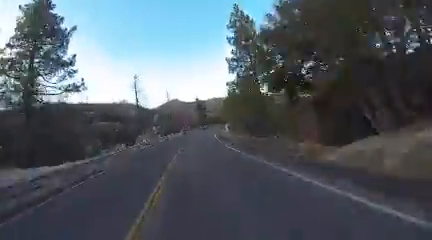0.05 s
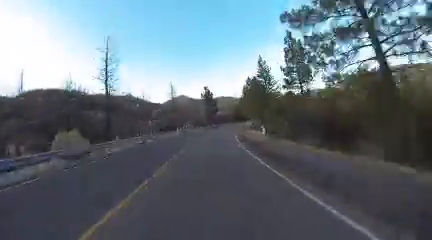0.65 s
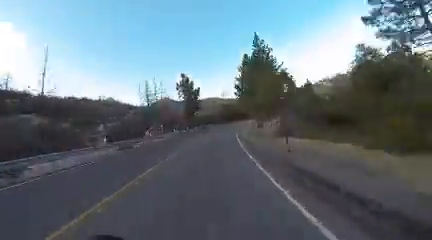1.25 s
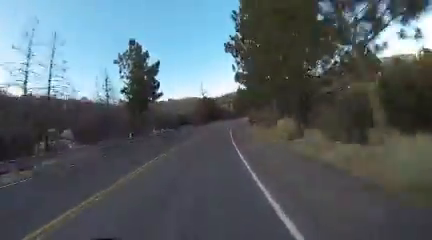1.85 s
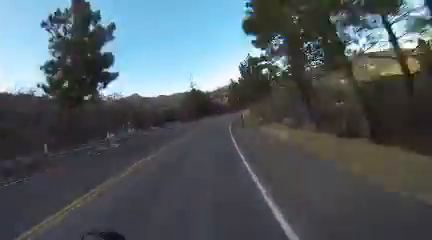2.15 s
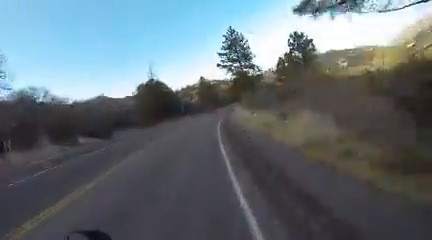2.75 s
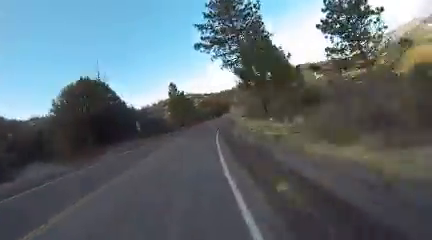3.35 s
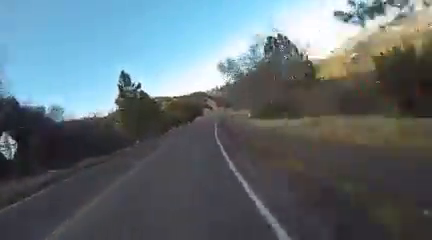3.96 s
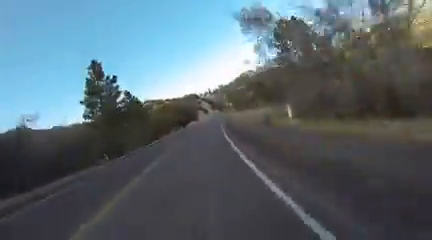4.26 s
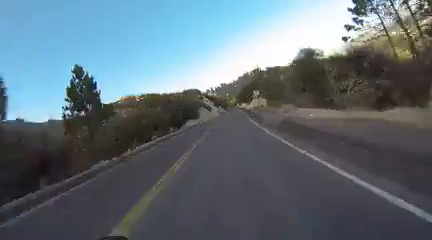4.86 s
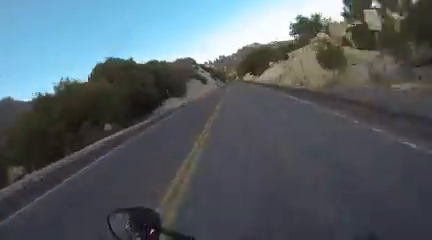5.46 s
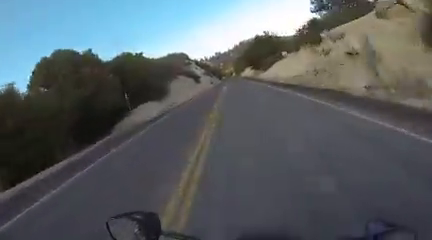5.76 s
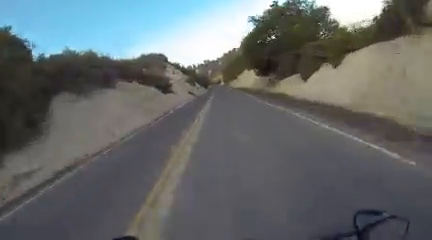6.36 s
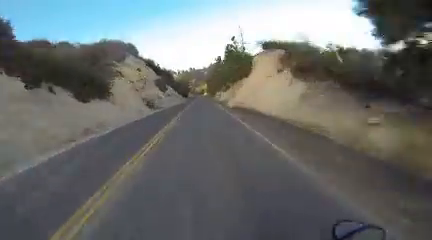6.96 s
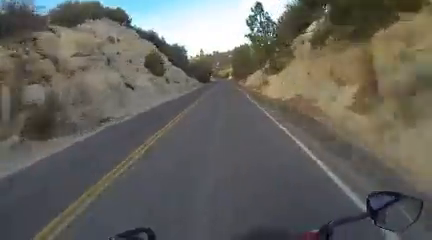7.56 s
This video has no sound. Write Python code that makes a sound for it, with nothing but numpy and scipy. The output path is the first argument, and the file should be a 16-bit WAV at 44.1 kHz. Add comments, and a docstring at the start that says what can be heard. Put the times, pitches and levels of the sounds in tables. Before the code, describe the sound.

Gusty wind buffets the microphone on a moving motorcycle while its humming engine gradually revs higher and grows louder.

```python
"""A motorcycle engine drones under thumping, fluttering wind, heard while riding up a mountain road.
Each firing of the engine makes one dip in air pressure, and the quick dips blend into a note.
At about five seconds the throttle opens: the note climbs and turns raspy, and the wind's roar eases.
Air tears past the housing of a camera on the bike. Its swirls roar, rush and hiss, flaring up
with every dip in pressure, and a faint whistle comes off an edge."""
import sys
import numpy as np
from scipy import signal
from scipy.fft import rfft, irfft, next_fast_len
from scipy.io import wavfile

SR = 44100
rng = np.random.default_rng(int(sys.argv[2]) if len(sys.argv) > 2 else 0)


def materialize(psi):
    """Save the field psi as 16-bit PCM at rate SR to the path in sys.argv[1].

    A 1-D psi becomes a single channel; in a 2-D psi each row is a channel.
    """
    bounded = np.clip(np.atleast_2d(psi).T, -1, 1)
    quanta = np.round(bounded * 32767).astype(np.int16)
    wavfile.write(sys.argv[1], SR, quanta)


N = 336042
TIME = np.arange(N) / SR


# How fast the engine runs. Each row: time in seconds, firings per second.
FIRING_RATE = [(0, 129.8), (.8, 129.6), (1.5, 135.8), (2.3, 136), (3, 138.7), (4, 136.5), (4.7, 140.5),
               (5, 143), (5.45, 145.2), (5.95, 145.6), (6.25, 147.4), (6.75, 151.8), (7.2, 156.2),
               (7.62, 161.2)]
# The engine's lowest note. Each row: time in seconds, level in dB.
HUM_LEVEL = [(0, -21.5), (.3, -30), (.55, -22), (1, -24), (1.15, -30.5), (1.35, -17), (1.65, -20.5),
             (2.45, -25), (2.85, -34.5), (3.15, -24), (4.2, -29.5), (4.93, -21.5), (5.06, -18.5),
             (5.9, -16.5), (6.75, -21), (7.62, -18)]
# The throttle, heard as the strength of the overtones. Each row: time in seconds, level in dB.
THROTTLE_LEVEL = [(0, -41.5), (1.6, -35), (2.6, -41.5), (4.05, -34), (4.45, -41), (4.72, -27),
                  (4.92, -33.5), (5.3, -27.5), (6.1, -24.5), (6.6, -25.5), (7, -29), (7.62, -21.5)]
# How the exhaust pipe shapes the overtones. Each row: frequency in Hz, boost or cut in dB.
PIPE_TONE = [(260, 2), (290, -1.5), (302, -12), (410, 1), (480, 1), (560, -8), (630, -4.5), (730, -10),
             (890, -12.5), (1025, -11.5), (1085, -20), (1160, -17.5), (1300, -27), (2200, -35)]

def engine(jitter_turns=0.0075, drift_turns=0.024, uneven=0.14, lope=0.038, pipe_delay=0.045):
    """Each firing makes one dip in pressure. Throttle sharpens the dips, and no two are equally strong."""
    firing_hz = over_time(FIRING_RATE)
    turns = np.cumsum(firing_hz) / SR + jitter_turns * wander(21) + drift_turns * wander(5.4)
    angle = 2 * np.pi * turns
    overtones = np.zeros(N)
    for k in range(2, 15):
        # the pipe delays the high overtones, so each dip trails off in a short ripple
        lag = pipe_delay * k * (k - 2)
        overtones += tone_gain(PIPE_TONE, k * firing_hz) * np.cos(k * angle - lag)
    hum = gain_of(over_time(HUM_LEVEL)) * np.cos(angle)
    bark = gain_of(over_time(THROTTLE_LEVEL)) * overtones
    # lope makes every other firing a little different
    strength = 1 + uneven * wander(68) + lope * np.cos(angle / 2)
    return -np.sqrt(2) * (hum + bark) * strength


# How loud the rasp is. Each row: time in seconds, level in dB.
RASP_LEVEL = [(0, -58), (5, -56.5), (5.6, -35), (5.9, -41), (6.05, -32.5), (6.25, -37), (6.45, -39),
              (7.1, -42), (7.62, -30.5)]
# The tone of the rasp. Each row: frequency in Hz, relative level in dB.
RASP_TONE = [(600, -31), (1100, -5.5), (1400, -1), (2000, 2), (2500, -11.5), (3000, -8), (4000, -21),
             (7000, -42.5)]

def rasp(motor):
    """A mid-range rasp beats with the firings while the engine pulls."""
    noise = turbulence(RASP_TONE, dips(motor), flutter_db=1, gust_db=0.87 * wander(40))
    return gain_of(over_time(RASP_LEVEL)) * noise


# The tone of the sizzle. Each row: frequency in Hz, relative level in dB.
SIZZLE_TONE = [(4000, -20.5), (6600, -6), (7050, 1), (7800, -2), (8700, 1), (10700, -3.5), (11600, -8),
               (12900, -6.5), (15000, -14)]

def sizzle(motor, below_throttle_db=38):
    """A high sizzle grows with the throttle and pulses with the firings."""
    noise = turbulence(SIZZLE_TONE, dips(motor), flutter_db=2, gust_db=0.6 * wander(30))
    return gain_of(over_time(THROTTLE_LEVEL) - below_throttle_db) * noise


def wind(motor, engine_share=0.27):
    """Big swirls of air and the engine's pulses chop the smaller swirls into a flutter."""
    big_db, small_db = airflow()
    gusts = wander(37)
    thumps = buffet(big_db)
    low_wind = thumps + roar(big_db, dips(thumps + motor), gusts)
    suction = dips(low_wind + engine_share * motor)
    return low_wind + rush(small_db, suction, gusts) + hiss(small_db, suction, gusts)


# The wind's swell. Each row: time in seconds, strength in dB above or below the usual.
WIND_SWELL = [(0, 1), (.12, 2.5), (.25, -1.5), (.45, 0), (.95, -3.5), (1.1, -3), (1.22, 1), (1.46, -3.5),
              (1.58, 2.2), (1.95, -0.5), (2.05, 1), (2.25, -1), (2.45, -0.5), (2.52, -3.5), (2.72, 0.2),
              (3.2, -1.5), (3.4, 3.3), (3.62, 0), (3.78, 2), (4.02, -1.3), (4.4, -1.1), (4.75, 1),
              (4.95, -1), (6.1, -0.5), (7.05, -1.5), (7.62, 1.5)]
# Sudden slaps of air. Each row: peak time in seconds, extra dB for big swirls, extra dB for small ones.
AIR_SLAPS = [(0.611, 7, 4.5), (2.455, 2.5, 2.5), (2.93, 6, 2), (3.42, 0, 0), (3.535, -2, 1.5),
             (3.88, 3.5, 3), (4.094, 4, 5), (4.645, 4, 3.5), (6.755, 8.5, 1.5)]

def airflow(flicker_db=0.5, rise_s=0.035, fall_s=0.018):
    """The strength of big and small swirls in dB: they swell, flicker and slap."""
    big_db = small_db = over_time(WIND_SWELL) + flicker_db * wander(9)
    for peak_s, big_extra_db, small_extra_db in AIR_SLAPS:
        width_s = np.where(TIME < peak_s, rise_s, fall_s)
        slap = np.exp(-((TIME - peak_s) / width_s) ** 2)
        big_db = big_db + big_extra_db * slap
        small_db = small_db + small_extra_db * slap
    return big_db, small_db


# How loud the thumping is. Each row: time in seconds, level in dB at the usual wind strength.
BUFFET_LEVEL = [(0, -20), (1.2, -20.5), (2, -19), (2.9, -19.5), (3.55, -15), (4.4, -20), (5, -21.5),
                (5.8, -23), (6.8, -20), (7.62, -24.5)]
# The tone of the thumping. Each row: frequency in Hz, relative level in dB.
BUFFET_TONE = [(5, -24.5), (15, -4.5), (28, 0.5), (45, 2), (65, 5), (95, 2), (130, 0), (170, -9),
               (260, -36), (500, -69.5)]

def buffet(big_db, wind_share=0.2):
    """Big swirls of air hit the housing with deep thumps."""
    level_db = over_time(BUFFET_LEVEL) + wind_share * big_db
    return gain_of(level_db) * coloured(rng.standard_normal(N), BUFFET_TONE)


# The tone of the roar. Each row: frequency in Hz, relative level in dB.
ROAR_TONE = [(50, -31), (100, -7), (140, 1), (185, 0.5), (240, -2), (300, -4.5), (380, -7), (500, -9.5),
             (700, -20.5), (1200, -41.5), (2500, -81)]

def roar(big_db, suction, gusts, base_db=-17.5, wind_share=0.86, calm_drop_db=4):
    """Rough air makes a low roar, which drops once the flow turns smoother."""
    level_db = base_db + wind_share * big_db - calm_drop_db * calm_air()
    return gain_of(level_db) * turbulence(ROAR_TONE, suction, flutter_db=2, gust_db=1.46 * gusts)


# The tone of the rush. Each row: frequency in Hz, relative level in dB.
RUSH_TONE = [(200, -28), (450, -5), (650, 0.5), (1000, -2), (1350, -9), (1900, -11.5), (2550, -20),
             (2950, -20.5), (3800, -28.5), (4700, -35), (5250, -36.5), (6000, -45), (9000, -61.5),
             (13000, -83)]

def rush(small_db, suction, gusts, base_db=-26):
    """Small swirls tear past the housing with a mid-range rush."""
    return gain_of(base_db + small_db) * turbulence(RUSH_TONE, suction, flutter_db=3, gust_db=gusts)


# How loud the hiss is. Each row: time in seconds, level in dB at the usual wind strength.
HISS_LEVEL = [(0, -60.5), (.9, -61), (1.7, -59.5), (2.6, -59), (3.1, -61.5), (4.2, -61), (5, -60),
              (5.6, -57.5), (6.4, -58.7), (6.55, -55.5), (6.7, -57), (7.62, -59)]
# The tone of the hiss. Each row: frequency in Hz, relative level in dB.
HISS_TONE = [(3000, -13), (5000, -0.5), (6100, -2), (6400, -2.5), (6900, -0.5), (7500, -2.5), (8600, 3.5),
             (9700, -5), (10800, -6), (11600, -13), (12900, -13.5), (14000, -17), (15100, -16.5)]

def hiss(small_db, suction, gusts):
    """The finest swirls add a faint, high hiss."""
    level_db = over_time(HISS_LEVEL) + small_db
    return gain_of(level_db) * turbulence(HISS_TONE, suction, flutter_db=2.5, gust_db=gusts)


def whistle(pitch_hz=6520, drift_hz=70, calm_drop_hz=150, width_hz=150, base_db=-67.5, fade_db=5):
    """Air whistles thinly over an edge: a narrow, drifting band of noise that soon sinks into the hiss."""
    calm = calm_air()
    hz = pitch_hz - calm_drop_hz * calm + drift_hz * (1 - calm) * wander(1.5)
    angle = 2 * np.pi * np.cumsum(hz) / SR
    band = wander(width_hz) * np.cos(angle) + wander(width_hz) * np.sin(angle)
    return gain_of(base_db - fade_db * soft_step(middle_s=2.4, ease_s=0.4)) * band


def calm_air():
    """Out of the bend the airflow settles: 0 means rough air, 1 means smooth air."""
    return soft_step(middle_s=5.08, ease_s=0.18)


def turbulence(tone, suction, flutter_db, gust_db):
    """The noise of swirling air flares with each dip in pressure and with passing gusts."""
    flare = gain_of(flutter_db * suction + gust_db)
    return coloured(rng.standard_normal(N) * flare, tone)


def dips(pressure):
    """How far the pressure falls below normal, with the extremes softened."""
    return 2.05 * np.tanh(-evened(pressure) / 2.6)


def soft_step(middle_s, ease_s):
    """Glides from 0 to 1, passing halfway at middle_s."""
    return 0.5 + 0.5 * np.tanh((TIME - middle_s) / ease_s)


def gain_of(db):
    """Turns decibels into a number to multiply a sound by."""
    return 10 ** (db / 20)


def evened(x):
    """Scales a signal to a typical size (rms) of 1."""
    return x / np.sqrt(np.mean(x ** 2) + 1e-20)


def over_time(rows):
    """Joins a table's points with straight lines, giving a value for every sample."""
    seconds, values = np.transpose(rows)
    return np.interp(TIME, seconds, values)


def tone_gain(tone, hz):
    """How strongly a tone table lets the given frequencies through."""
    row_hz, row_db = np.transpose(tone)
    return gain_of(np.interp(np.log(hz + 1), np.log(row_hz + 1), row_db))


def coloured(x, tone):
    """Filters a sound with a tone table, then scales it to a typical size of 1."""
    size = next_fast_len(N)
    hz = np.fft.rfftfreq(size, 1 / SR)
    spectrum = rfft(x, size) * tone_gain(tone, hz)
    return evened(irfft(spectrum, size)[:N])


def wander(rate_hz):
    """A smooth random wobble, up to about rate_hz fast, with a typical size of 1."""
    size = next_fast_len(N)
    hz = np.fft.rfftfreq(size, 1 / SR)
    spectrum = rfft(rng.standard_normal(size)) / np.sqrt(1 + (hz / rate_hz) ** 6)
    return evened(irfft(spectrum, size)[:N])


def smooth(x, corner_hz):
    """Gently irons out changes faster than corner_hz."""
    memory = np.exp(-2 * np.pi * corner_hz / SR)
    return signal.lfilter([1 - memory], [1, -memory], x)


def scene():
    """The engine and the wind, mixed into one channel."""
    motor = engine()
    return (motor + rasp(motor) + sizzle(motor) + wind(motor) + whistle())[None]


def record(dry, threshold_db=-15, squeeze=0.77, boost_db=0.8, top_hz=15080):
    """Quickly turns down the loudest thumps, rounds off the peaks and cuts the highest treble."""
    power_db = 10 * np.log10(smooth(dry[0] ** 2, corner_hz=25) + 1e-9)
    excess_db = np.maximum(power_db - threshold_db, 0)
    turn_down_db = squeeze * smooth(excess_db, corner_hz=150)
    held = dry * gain_of(boost_db - turn_down_db)
    rounded = held / (1 + held ** 8) ** (1 / 8)
    treble_cut = signal.firwin(511, top_hz, window=("kaiser", 9), fs=SR)
    return signal.oaconvolve(rounded, treble_cut[None], "same")


dry = scene()
out = record(dry)
materialize(out)
```